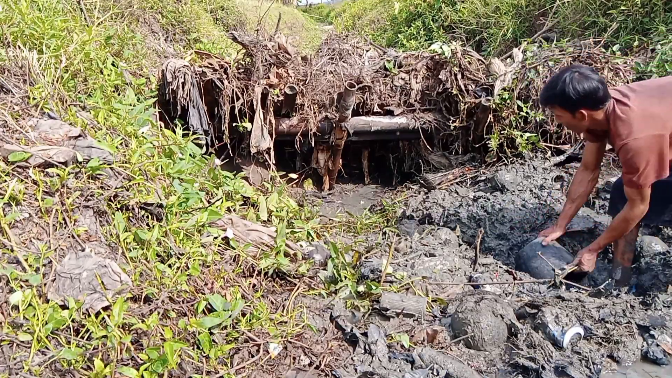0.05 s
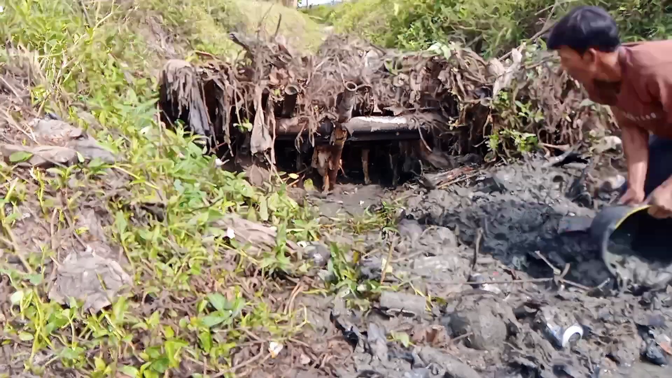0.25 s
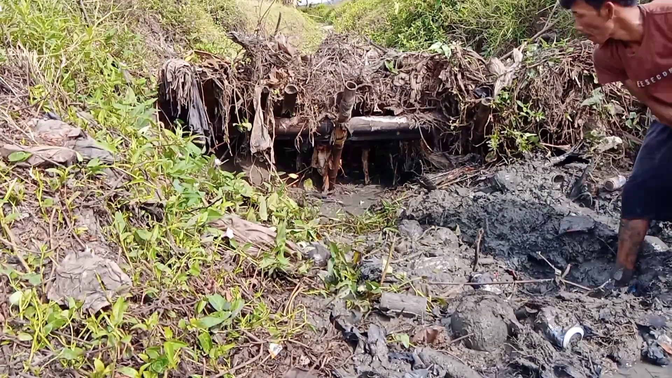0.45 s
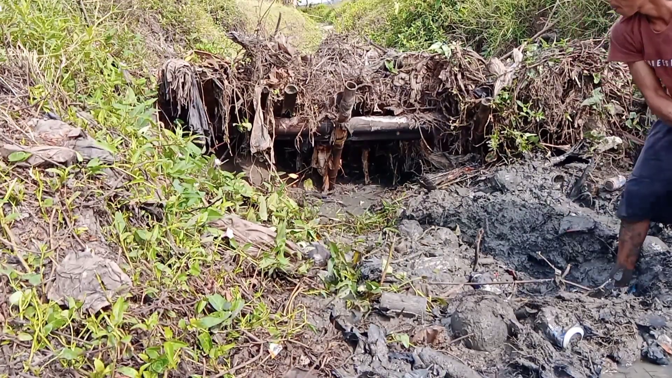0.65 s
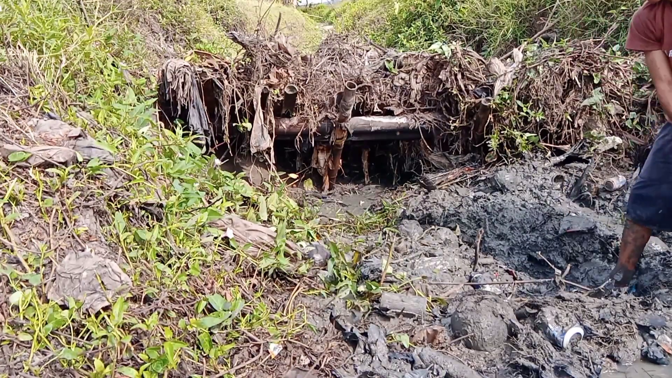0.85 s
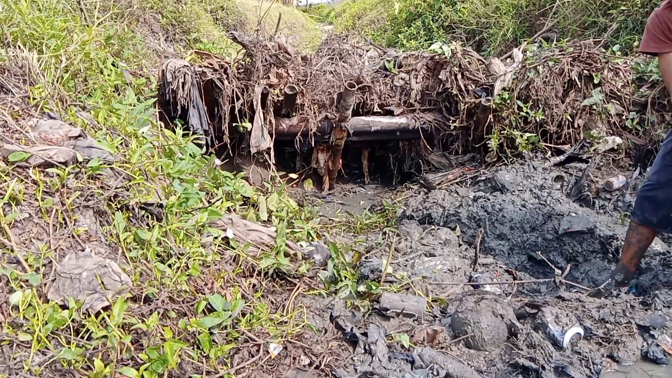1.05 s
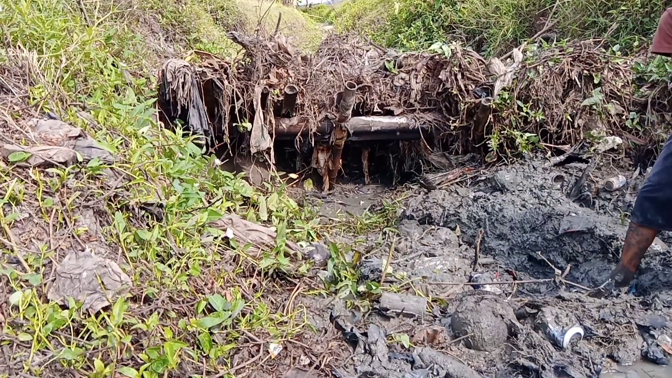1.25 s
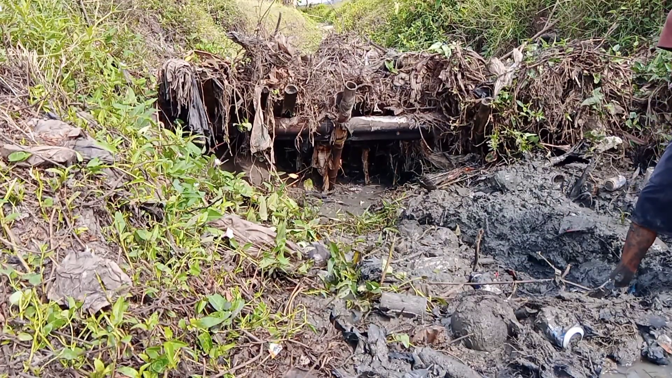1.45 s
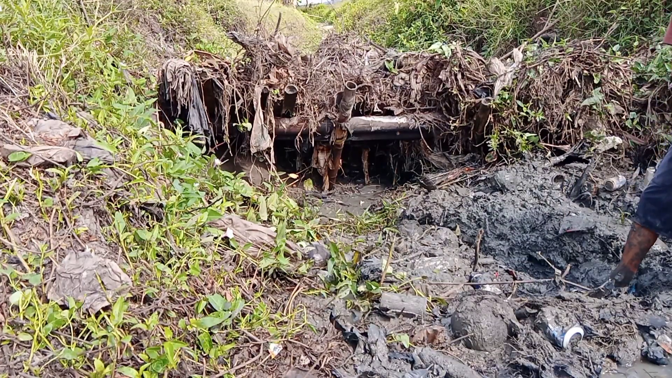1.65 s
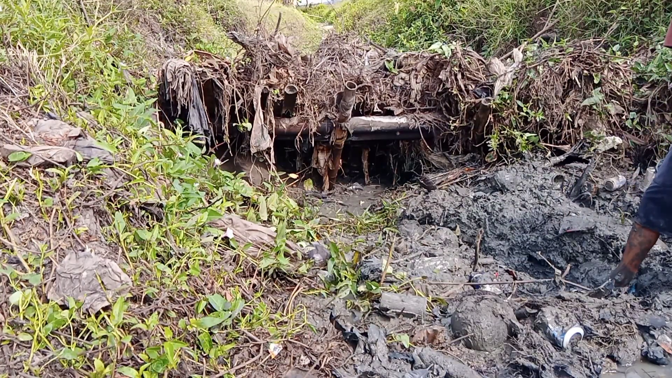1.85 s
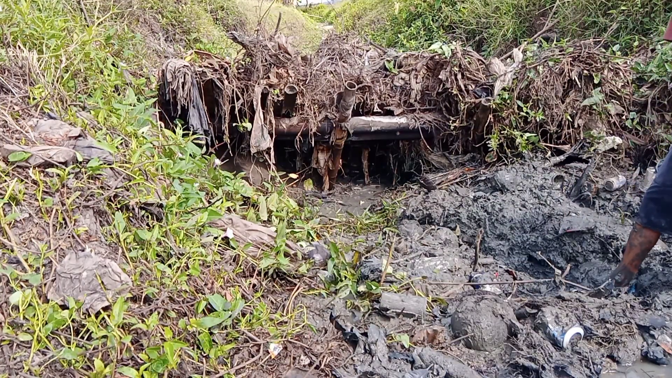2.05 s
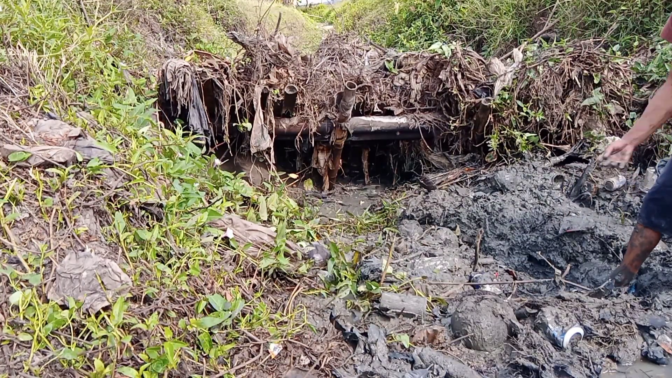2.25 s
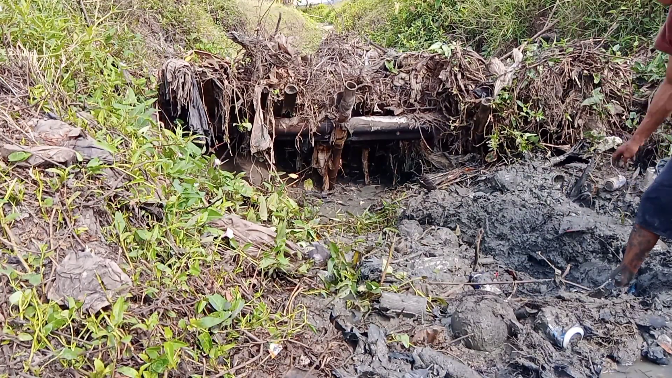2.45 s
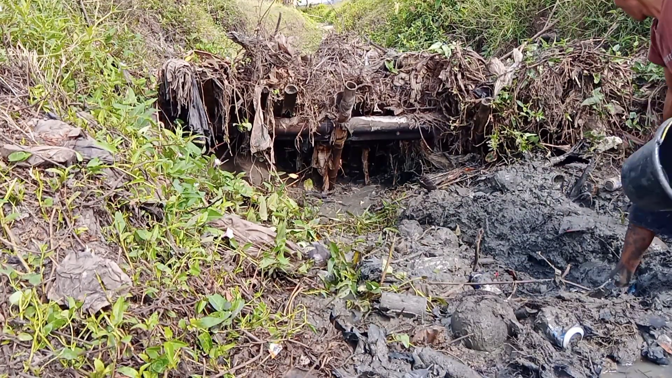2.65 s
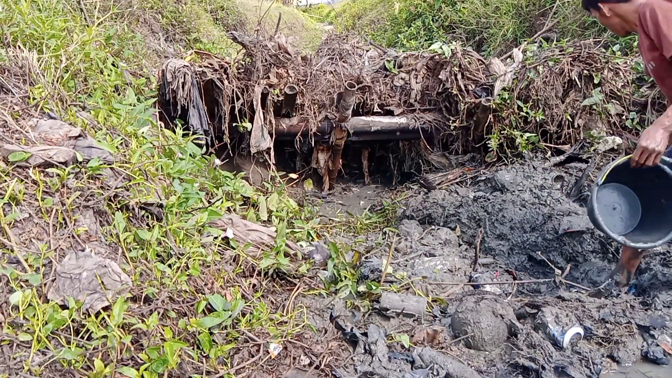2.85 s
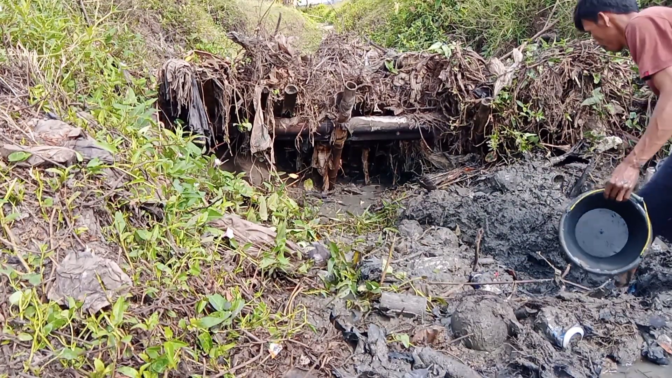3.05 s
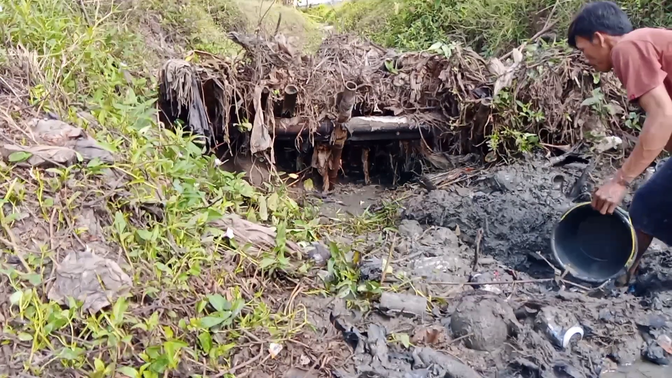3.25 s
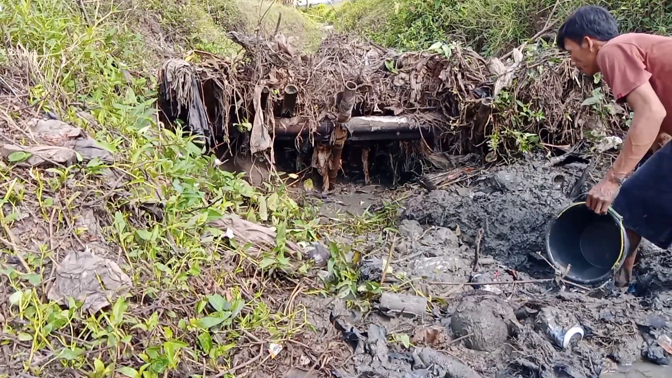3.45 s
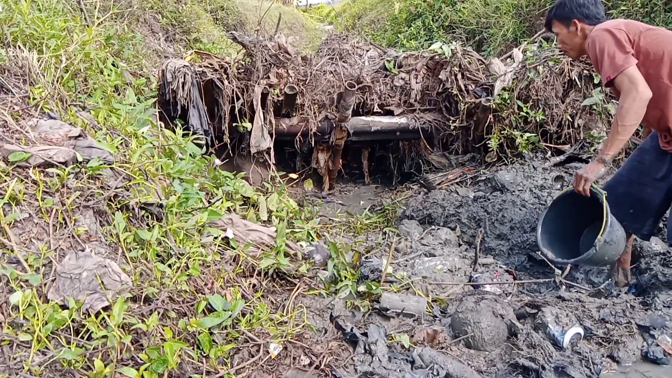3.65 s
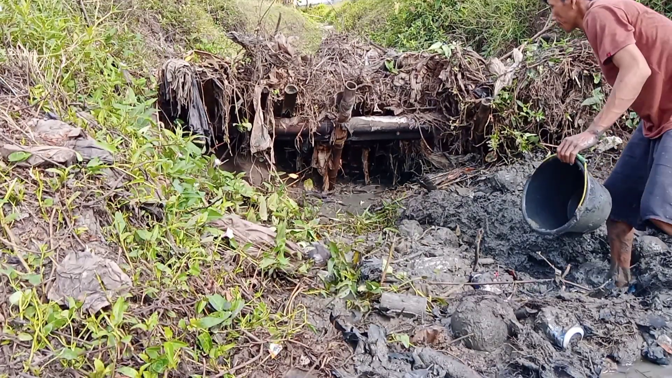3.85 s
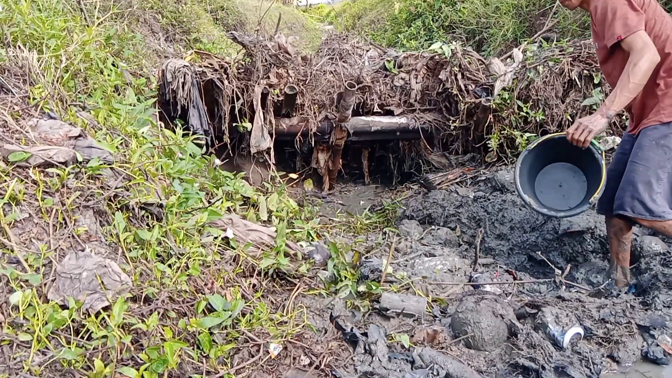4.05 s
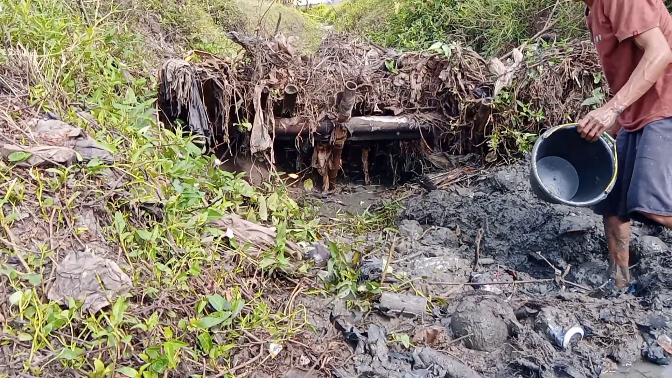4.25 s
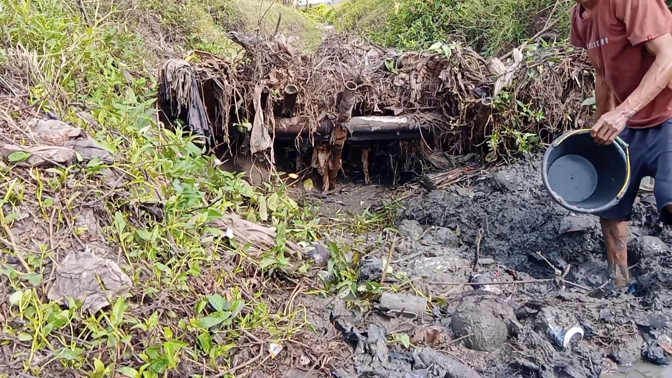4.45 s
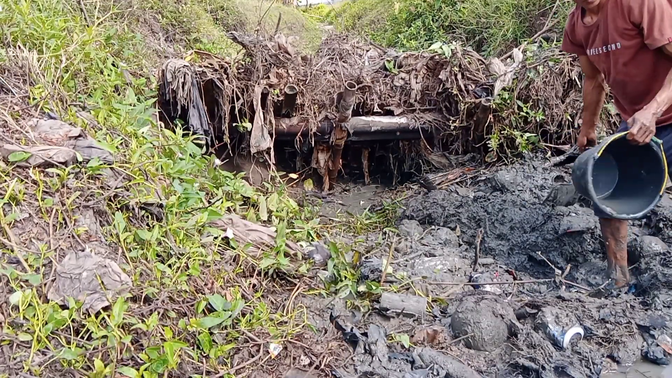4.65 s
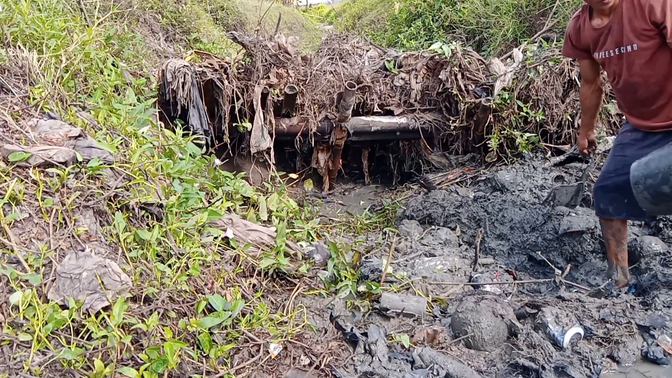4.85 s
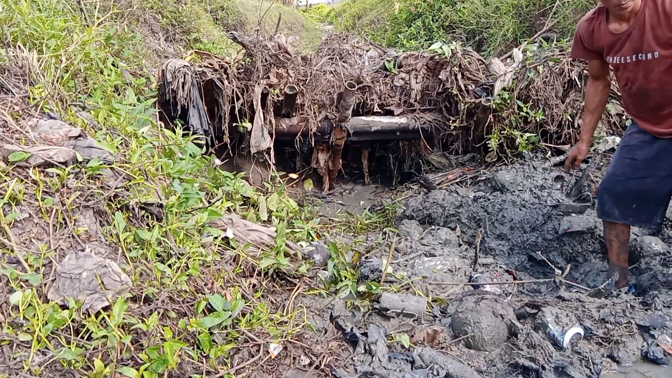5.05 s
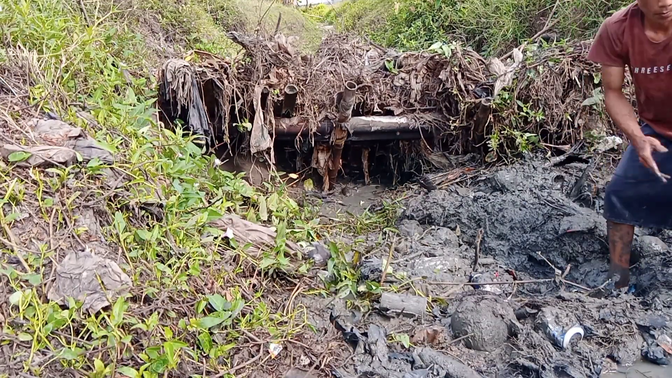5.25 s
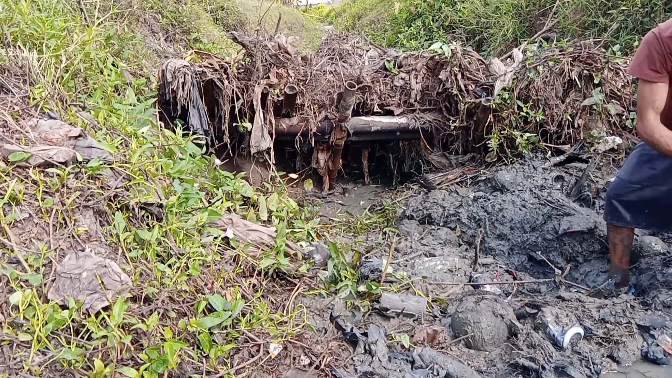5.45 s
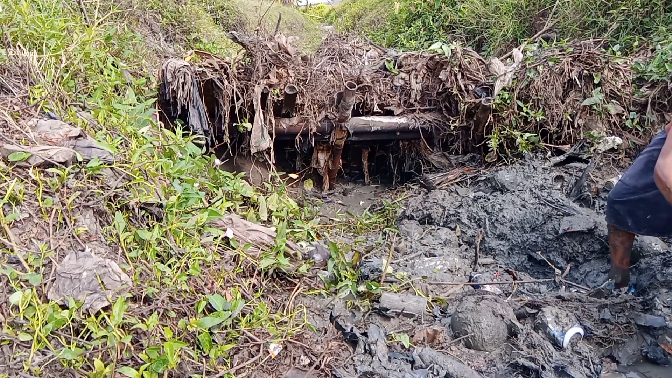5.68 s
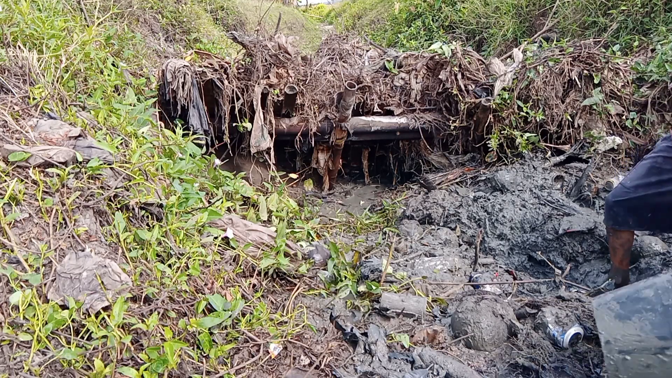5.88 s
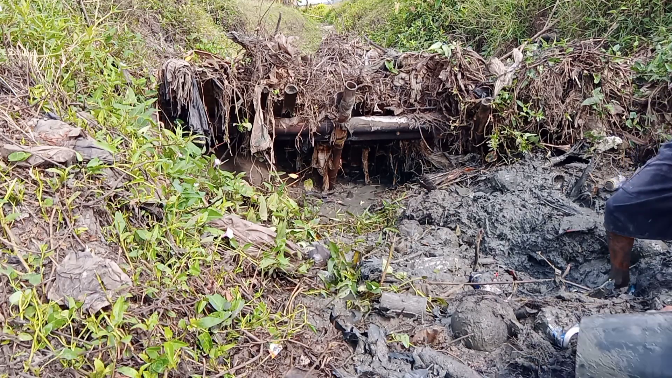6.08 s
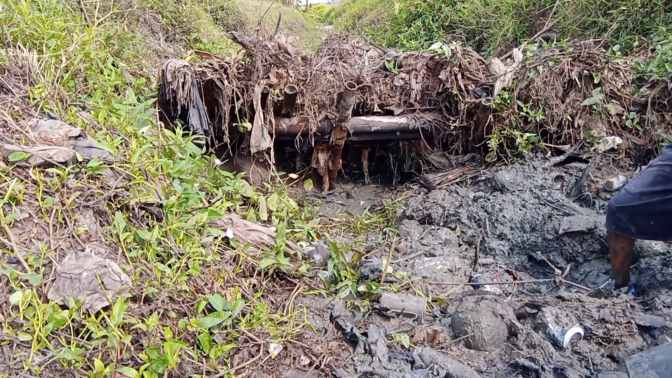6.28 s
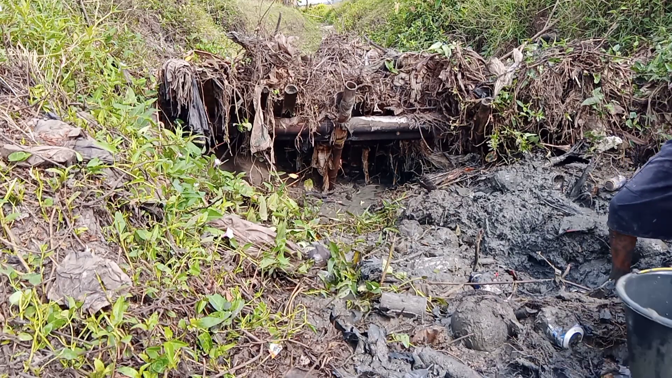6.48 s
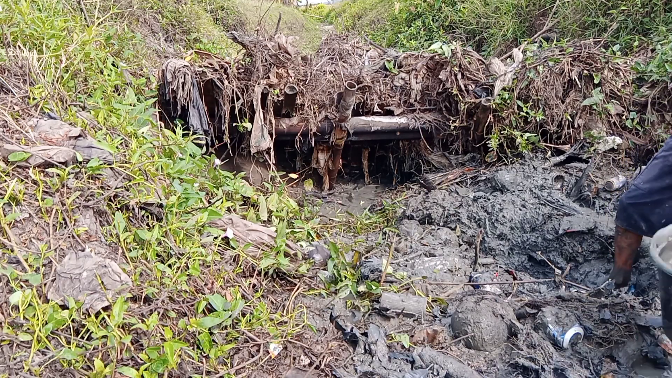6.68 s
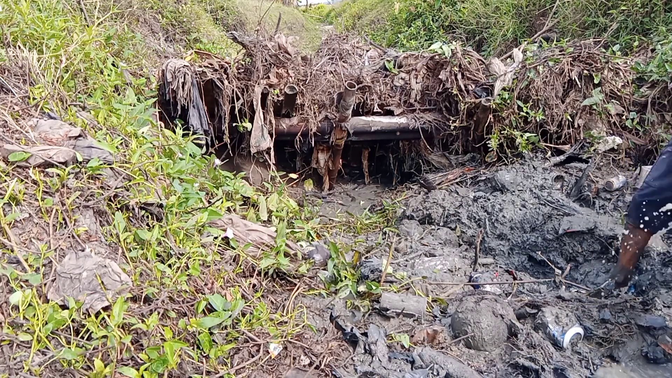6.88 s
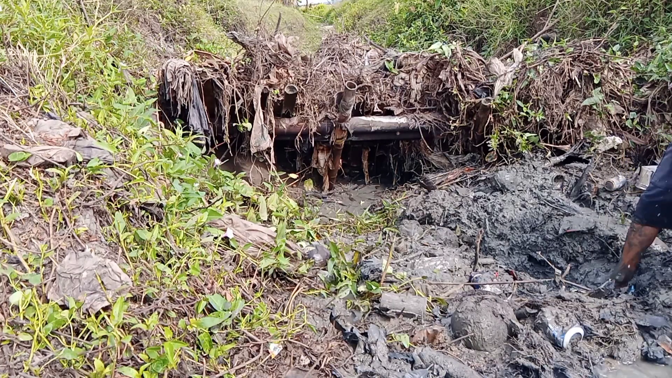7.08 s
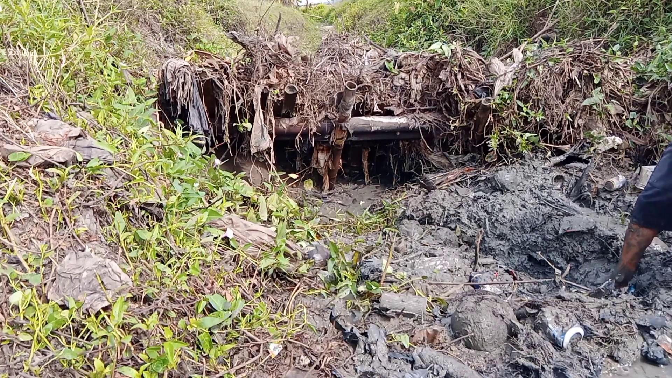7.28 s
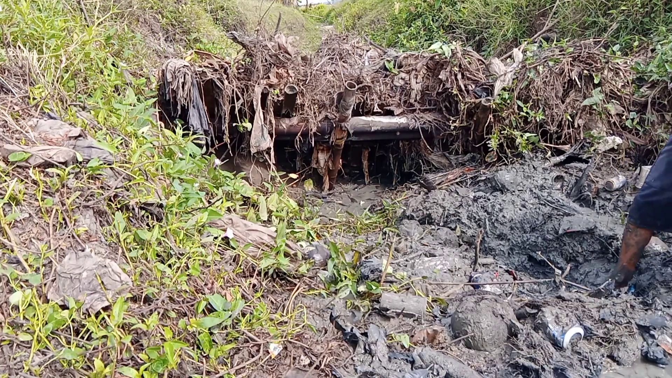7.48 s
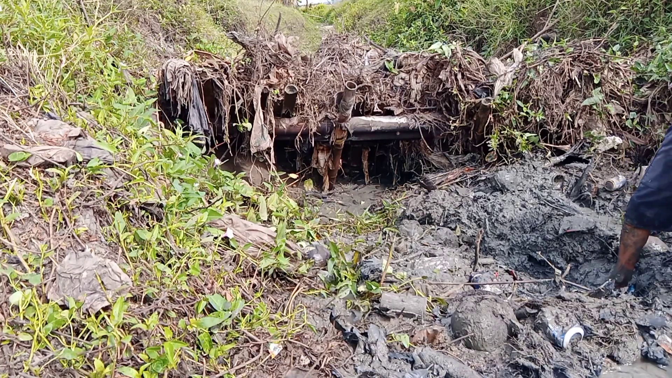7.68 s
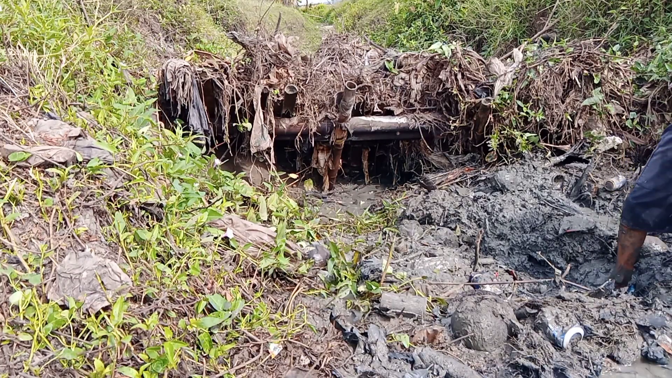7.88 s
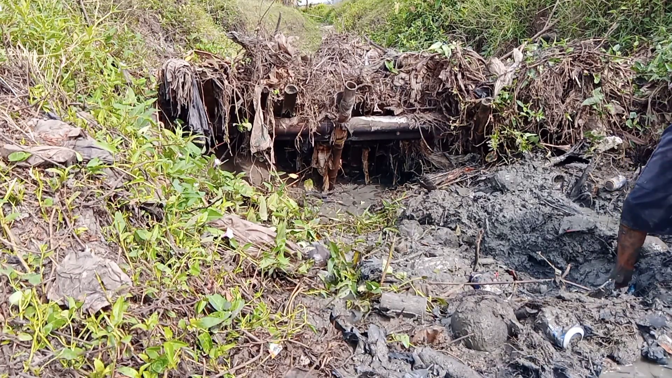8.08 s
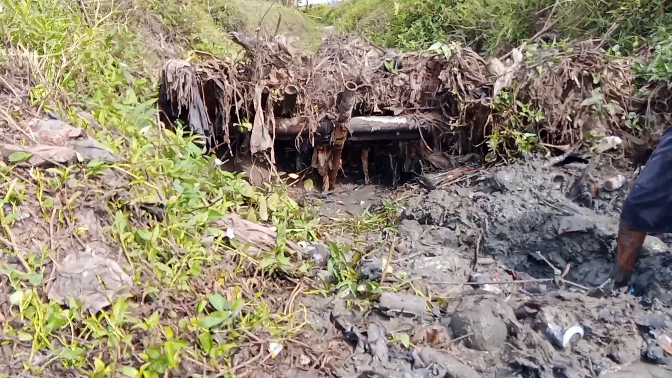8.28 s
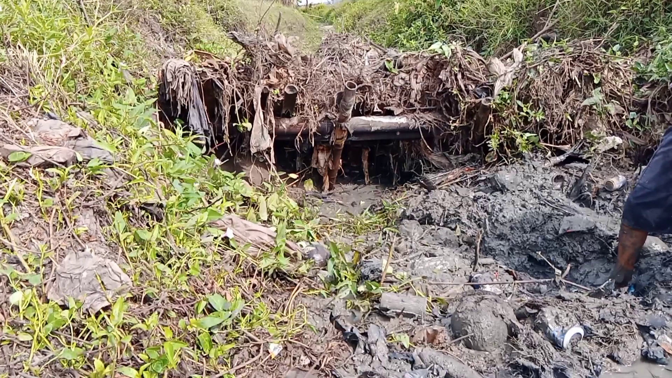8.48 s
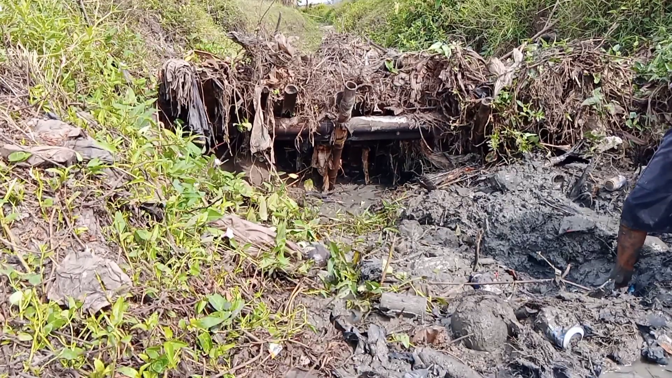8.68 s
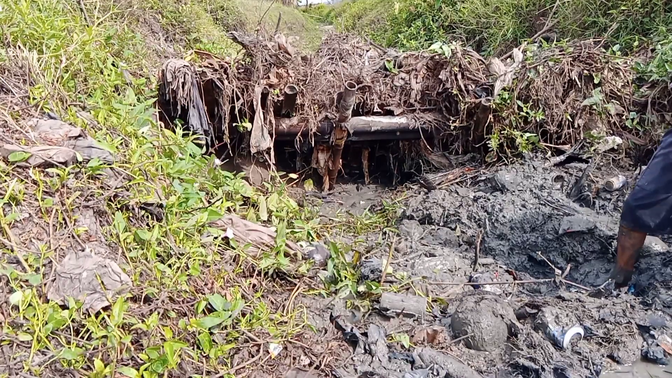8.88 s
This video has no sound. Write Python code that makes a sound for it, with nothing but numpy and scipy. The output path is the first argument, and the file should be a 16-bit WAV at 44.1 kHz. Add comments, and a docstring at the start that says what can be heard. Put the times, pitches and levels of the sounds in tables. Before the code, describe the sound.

One bucketful is lifted with deep gulps and thrown, the loudest hiss of droplets landing on mud within the first second. Sparse plops, sticky crackles and faint clods fill a quiet middle. Later, water churns with ringing bubbles, sharp wet slaps and streaming drips as the bucket scoops again. Close, dry outdoor microphone, with a low distant pump-like engine, faint high chirps and soft air.

```python
"""Close to a shallow muddy pool outdoors: a full plastic bucket is lifted out dribbling and its load is flung away.
The water, a cloud of bursting droplets over rising bubbles, lands on the mud and patters away.
Then mud squelches in fine crackles and feet shift in the shallows, with clods slapping down as short bursts of grit.
At last the bucket is dragged through the pool and drawn through once more, water streaming off it.
Throughout, a far one-cylinder engine, probably a pump, chugs as filtered pulses, with faint high chirps, air and breeze."""
import sys
import numpy as np
from scipy import signal
from scipy.fft import rfft, irfft
from scipy.io import wavfile
from scipy.ndimage import uniform_filter1d

SR = 44100
rng = np.random.default_rng(int(sys.argv[2]) if len(sys.argv) > 2 else 0)


def master_out(mix):
    """Clip the mix to full scale and print it as 16-bit PCM to the path in sys.argv[1]."""
    frames = np.transpose(np.atleast_2d(mix))
    ceiling = np.clip(frames, -1, 1)
    pcm = np.round(ceiling * 32767).astype(np.int16)
    wavfile.write(sys.argv[1], SR, pcm)


N = 393372
TIME = np.arange(N) / SR

# Surges of water: bucket lifted full and dribbling (from 0 s), load flung out (.75), feet in the shallows (3.78),
# bucket dragged through the pool (6.19) and drawn through once more (7.53).
# Each row: crest in seconds, hold in seconds, spray level in dB, bubbling level in dB (both before the trims
# of each layer), seconds to fade by 20 dB.
WATER_SURGES = [ (0, .005, -47, -36, .1), (.12, .06, -46, -48, .1), (.23, .08, -50, -58, .05),
                (.41, .07, -51, -53, .06), (.53, .06, -51, -68, .1), (.63, .05, -49, -57, .1),
                (.715, .01, -41, -43, .1), (.75, .1, -32.5, -37, .11), (.93, .1, -42.5, -45, .15),
                (1.22, .02, -61, -78, .5), (3.78, .26, -95, -75, .3), (5.335, .01, -82, -59, .15),
                (5.455, .025, -79, -56, .06), (5.64, .05, -80, -59, .04), (5.78, .05, -70, -62, .1),
                (5.915, .005, -65, -70, .06), (5.97, .08, -75, -59, .3), (6.19, .05, -65, -49, .15),
                (6.29, .07, -55, -48, .15), (6.485, .06, -52, -49, .1), (6.63, .3, -43.5, -43, .2),
                (7.05, .12, -47, -45, .25), (7.36, .07, -60, -66, .15), (7.53, .13, -55, -49.5, .2),
                (7.75, .04, -53, -54, .1), (7.81, .11, -44.5, -49, .4), (8.05, .1, -45.5, -48, .1),
                (8.23, .08, -46, -49, .08), (8.39, .08, -47, -52, .1), (8.52, .36, -41.5, -41.5, .12)]
SURGE_ATTACK_S = 0.05  # to rise by 20 dB

# Spectrum of droplets striking. Each row: frequency in Hz, relative level in dB per Hz.
DROPLET_SPECTRUM = [(500, -39), (1500, -6.5), (3000, -2.5), (4500, 1.5), (6000, 5), (7600, -5.5),
                    (9000, -9), (11000, -14), (13500, -18), (16000, -6)]

# Hollow ring of the splashing, strongest as the bucket is emptied.
# Each row: time in seconds, level in dB relative to the spray.
HOLLOW_RING = [(0, -18), (1.2, -12.5), (6.0, -26), (7.8, -25), (8.9, -19)]

# Big pockets of air pushed under water.
# Each row: crest in seconds, hold in seconds, level in dB before the trim of the deep bubbles.
AIR_GULPS = [(.005, .03, -44), (.088, .015, -47), (.18, .01, -59), (5.33, .015, -62), (5.46, .02, -68),
             (5.91, .01, -67), (6.005, .01, -56), (6.14, .04, -58), (6.195, .05, -43), (6.32, .05, -54),
             (6.55, .25, -63), (7.11, .12, -59), (7.37, .02, -59), (7.52, .06, -53), (7.65, .06, -62),
             (8.16, .012, -55)]
GULP_ATTACK_S, GULP_FADE_S = 0.02, 0.08  # to rise, to fade by 20 dB

# Single loud bubbles and drips.
# Each row: start in seconds, peak level in dB, starting pitch in Hz, cycles to die away by 60 dB.
LONE_BUBBLES = [(.003, -36, 239, 24), (.087, -34, 240, 14), (.178, -38, 1740, 57), (.243, -43, 2150, 57),
                (.531, -46, 2150, 59), (.695, -42, 1700, 76), (1.04, -37, 1980, 40), (1.055, -41, 706, 27),
                (1.676, -41, 5670, 120), (2.061, -34, 630, 14), (2.126, -36, 1264, 16),
                (2.275, -39, 1410, 5), (2.363, -42, 2260, 44), (2.658, -57, 2250, 57), (3.0, -59, 1430, 45),
                (3.492, -52, 2800, 72), (3.572, -61, 570, 42), (3.872, -54, 3950, 58),
                (4.28, -52, 3580, 30), (4.332, -52, 3840, 40), (5.249, -50, 6170, 47),
                (5.636, -34, 910, 13), (5.824, -44, 362, 16), (6.009, -37, 1000, 5), (6.165, -40, 315, 7),
                (6.205, -33, 298, 9), (6.357, -47, 380, 46), (6.258, -43, 617, 30), (6.281, -35, 767, 36),
                (6.306, -45, 1310, 30), (6.324, -43, 1550, 28), (6.432, -34, 5570, 82),
                (6.447, -39, 1170, 16), (6.483, -23, 2150, 16), (6.485, -41, 644, 87),
                (6.562, -25, 5100, 20), (6.592, -36, 1720, 16), (6.62, -21, 5570, 38), (6.64, -37, 745, 54),
                (6.722, -31, 2040, 25), (6.93, -35, 893, 110), (7.055, -33, 1190, 9), (7.06, -51, 165, 14),
                (7.167, -19, 2870, 16), (7.17, -23, 3580, 33), (7.487, -37, 1140, 5), (7.565, -42, 326, 21),
                (7.605, -40, 1800, 25), (7.655, -40, 1070, 12), (7.854, -27, 4480, 74),
                (7.884, -28, 3930, 56), (8.057, -37, 1830, 60), (8.128, -29, 2250, 15),
                (8.277, -45, 920, 24), (8.417, -28, 4450, 45), (8.529, -27, 1870, 46),
                (8.603, -33, 1310, 19)]

# Wet slaps. Each row: start in seconds, level in dB, tilt in dB
# (below 0 a thud of thick mud, above 0 a spatter of thin water).
WET_SLAPS = [(.002, -35, -2), (.086, -41, -3), (.706, -47, 14), (.756, -47, 13), (.854, -48, 17),
             (1.169, -58, 14), (1.401, -66, 15), (2.058, -37, 9), (2.077, -38, 4), (2.1, -52, 11),
             (2.359, -55, 8), (2.657, -69, 8), (3.572, -68, 2), (5.323, -68, -6), (5.455, -59, -2),
             (5.635, -50, -8), (5.769, -56, 2), (5.821, -45, -3), (6.008, -46, -1), (6.056, -39, 4),
             (6.061, -34, 6), (6.194, -45, -5), (6.241, -48, -11), (6.482, -42, 6), (6.56, -45, 13),
             (6.76, -38, 5), (6.907, -40, 10), (6.926, -39, 4), (6.996, -44, 8), (7.052, -38, 7),
             (7.099, -37, 4), (7.37, -47, 1), (7.471, -54, 13), (7.543, -43, -1), (7.655, -50, 2),
             (7.91, -43, 13), (8.374, -51, 17), (8.496, -47, 12), (8.527, -42, 10), (8.831, -46, 18),
             (8.874, -39, 9)]

# Wet mud working under shifting feet. Each row: crest in seconds, hold in seconds, level in dB.
MUD_SQUELCHES = [(1.48, .04, -74), (1.61, .1, -75), (1.865, .02, -68), (1.96, .07, -77), (2.075, .04, -49),
                 (2.24, .05, -72), (2.45, .06, -75), (2.61, .06, -67), (2.98, .03, -76), (3.49, .1, -75),
                 (3.875, .03, -73), (3.94, .01, -70), (4.02, .02, -75), (4.3, .03, -75), (4.43, .015, -71),
                 (4.66, .17, -77), (4.92, .015, -68), (5.07, .1, -79), (5.24, .04, -73), (5.77, .08, -66)]
SQUELCH_ATTACK_S, SQUELCH_FADE_S = 0.025, 0.065  # to rise, to fade by 20 dB

# Pace and loudness of the distant engine. Each row: time in seconds, firings per second, level in dB.
ENGINE_RUN = [(0, 20.63, -61), (1.3, 20.64, -61.5), (2.2, 20.8, -63.5), (2.8, 20.52, -64),
              (3.8, 20.27, -65), (5.2, 20.38, -66), (6.2, 20.25, -66.5), (7.4, 20.26, -70),
              (8.92, 20.15, -71)]

# Spectrum of its exhaust thump. Each row: frequency in Hz, relative level in dB per Hz.
EXHAUST_SPECTRUM = [(30, -48), (60, -17.5), (82, -3.5), (102, 2.5), (125, 1), (145, -0.5), (185, -25.5),
                    (245, -17), (310, -14.5), (400, -24.5), (600, -55), (3000, -85)]

# Spectrum of the open air. Each row: frequency in Hz, relative level in dB per Hz.
AIR_SPECTRUM = [(25, 7), (70, -1), (150, 17), (300, 3), (600, 3.5), (1300, -2), (2500, -9), (5500, -5),
                (7700, -10.5), (10000, -14), (13500, -20), (16000, -14.5)]

# Resonances and notches of the microphone port.
# Each row: frequency in Hz, width in Hz (a notch is widened further by its depth), gain in dB.
PORT_RESONANCES = [(1249.4, 53.5, 10), (6660, 180, -15), (7310, 990, 8), (15100, 830, 10)]


def from_db(db):
    """Amplitude gain of a level in dB."""
    return 10 ** (np.asarray(db) / 20)


def rms_one(x):
    """Scale to an rms of 1."""
    return x / np.sqrt(np.mean(x ** 2) + 1e-20)


def in_time(rows):
    """Each column of a curve at every sample."""
    seconds, *columns = np.transpose(rows)
    return [np.interp(TIME, seconds, column) for column in columns]


def add(out, start_s, sound):
    """Mix a short sound in at its start time."""
    at = int(np.clip(start_s * SR, 0, N - 1))
    out[at:at + len(sound)] += sound[:N - at]


def swells(rows, attack_s):
    """Gain curve from rows of crest s, hold s, dB, s to fade by 20 dB; overlapping swells add in power."""
    power = np.zeros(N)
    for crest_s, hold_s, db, fade_s in rows:
        start_s = max(crest_s - 2 * attack_s, 0)
        age = TIME[:SR] + start_s - crest_s
        rising = np.maximum(-age, 0) / attack_s
        fading = np.maximum(age - hold_s, 0) / fade_s
        add(power, start_s, from_db(db - 20 * (rising + fading)) ** 2)
    return np.sqrt(power)


def band(x, low_hz, high_hz):
    """Keep one band of frequencies."""
    sections = signal.butter(2, [low_hz, high_hz], "band", fs=SR, output="sos")
    return signal.sosfilt(sections, x + 1e-18)


def colour(x, spectrum, size=4096):
    """Causal (minimum-phase) filter with the given spectrum; rms 1."""
    hz, db = np.transpose(spectrum)
    grid = np.maximum(np.fft.rfftfreq(size, 1 / SR), 1)
    gain = from_db(np.interp(np.log(grid), np.log(hz), db))
    cepstrum = irfft(np.log(gain))
    # folding the cepstrum onto positive time puts the energy as early as possible
    index = np.arange(size)
    folded = 2 * cepstrum * (index < size // 2) * (index > 0)
    response = irfft(np.exp(rfft(folded)))
    return rms_one(signal.fftconvolve(x, response)[:N])


def drift(per_s):
    """Smooth random wander of spread 1, with per_s new values a second."""
    points = rng.standard_normal(N // 10)
    return rms_one(np.interp(TIME * per_s, np.arange(N // 10), points))


def evened(x, span_s):
    """Hold the running level of a grain cloud near 1 and keep its fine grain."""
    span = int(span_s * SR) + 1
    power = uniform_filter1d(uniform_filter1d(x ** 2, span), span)
    return x / np.sqrt(np.abs(power) + np.mean(x ** 2) / 100)


def bubble(hz, cycles, rise, swell=1.5):
    """A trapped bubble swells in about a cycle, rings down and climbs in pitch as it nears the surface."""
    age = np.arange(int(cycles / hz * SR) + 2) * hz / SR  # in cycles of the starting pitch
    envelope = from_db(-60 * age / cycles) * (1 - np.exp(-(age / swell) ** 2))
    phase = 2 * np.pi * age * (1 + rise * age / cycles / 2)
    return envelope / envelope.max() * np.sin(phase)


def bubble_cloud(low_hz, high_hz, cycles, rise, spread_db, tilt_db, count):
    """Bubbles born at random, spread over log pitch, with tilt_db per octave; cycles and rise are averages."""
    out = np.zeros(N)
    for when, size, strength, damping, depth in rng.random((count, 5)):
        hz = low_hz * (high_hz / low_hz) ** size
        strength_db = -spread_db * np.log(max(strength, 0.01))
        gain = from_db(strength_db + tilt_db * np.log2(hz / low_hz))
        add(out, when * N / SR, gain * bubble(hz, cycles * (0.5 + damping), 2 * rise * depth))
    return rms_one(out)


def crackle(per_s, spread_db, clump_db):
    """Droplet impacts of very uneven size, their strength wandering in clumps."""
    born = rng.random(N) < per_s / SR
    uneven_db = spread_db * np.minimum(rng.exponential(1, N), 5)
    sizes = from_db(uneven_db + clump_db * drift(170))
    return born * sizes * rng.choice([-1, 1], N)


def spray():
    """Droplets click and leave tiny ringing bubbles; the harder the splash, the denser they fall."""
    rows = [(crest_s, hold_s, db, fade_s) for crest_s, hold_s, db, _, fade_s in WATER_SURGES]
    # the drops come down in uneven handfuls
    gain = swells(rows, SURGE_ATTACK_S) * from_db(0.7 * drift(50))
    impacts = crackle(per_s=4000 * (gain / from_db(-45)) ** 0.51, spread_db=3.5, clump_db=4.0)
    clicks = evened(colour(impacts, DROPLET_SPECTRUM), span_s=0.1)
    fizz = bubble_cloud(low_hz=3077, high_hz=8210, cycles=55, rise=0.19, spread_db=5.5, tilt_db=6.0, count=4600)
    fizz = evened(fizz, span_s=0.036)
    # the patter keeps one narrow, hollow tone ringing
    ring = evened(band(impacts, low_hz=1166, high_hz=1320), span_s=0.04)
    hollow = from_db(in_time(HOLLOW_RING)[0]) * ring
    return gain * (from_db(-1.5) * clicks + from_db(-7.0) * fizz + hollow)


def slosh():
    """Stirred water: small bubbles over a wash of lapping, and deep gulps of air."""
    small = bubble_cloud(low_hz=1400, high_hz=3570, cycles=33, rise=0.56, spread_db=4.0, tilt_db=1.5, count=2400)
    middling = bubble_cloud(low_hz=617, high_hz=1400, cycles=23, rise=0.3, spread_db=3.5, tilt_db=4.5, count=1000)
    wash = rms_one(band(crackle(per_s=4000, spread_db=3.0, clump_db=3.5), low_hz=795, high_hz=1920))
    deep = bubble_cloud(low_hz=278, high_hz=620, cycles=12, rise=0.38, spread_db=1.5, tilt_db=2.5, count=900)
    rows = [(crest_s, hold_s, db, fade_s) for crest_s, hold_s, _, db, fade_s in WATER_SURGES]
    stir = swells(rows, SURGE_ATTACK_S)
    # any surge makes some big bubbles, up to the most that the shallow pool can hold
    deep_share = np.minimum(from_db(-22) * stir, from_db(-63))
    pockets = swells([(*row, GULP_FADE_S) for row in AIR_GULPS], GULP_ATTACK_S)
    gulps = np.hypot(pockets, deep_share)
    # gentle stirring only laps; it takes a brisk stroke to pull air under
    aerated = np.minimum(stir / from_db(-52), 1) ** 1.2
    bubbles = aerated * (small + from_db(-4.0) * middling)
    gurgle = evened(bubbles + from_db(-3.0) * wash, span_s=0.028)
    flutter = from_db(1.5 * drift(70))
    shallow = from_db(-3.2) * stir * flutter * gurgle
    return shallow + from_db(-4.0) * gulps * evened(deep, span_s=0.032)


def plops():
    """The bubbles that stand out on their own, each a ringing tone that climbs in pitch."""
    out = np.zeros(N)
    for start_s, db, hz, cycles in LONE_BUBBLES:
        add(out, start_s, from_db(db) * bubble(hz, cycles, rise=0.3, swell=1.3))
    return out


def splats(attack_s=0.0008, fade_s=0.012, smack_db=2.5):
    """Each slap is a short gritty burst: a thud of the mud, a smack of its surface and a spatter of drops."""
    grit = crackle(per_s=14000, spread_db=1.5, clump_db=-2.0)
    thud = band(grit, low_hz=240, high_hz=611)
    smack = band(grit, low_hz=650, high_hz=2480)
    spatter = colour(grit, DROPLET_SPECTRUM)
    envelopes = np.zeros((3, N))
    age = TIME[:SR // 4]
    shape = (1 - np.exp(-age / attack_s)) * np.exp(-2 * age / fade_s)
    for start_s, db, tilt_db in WET_SLAPS:
        for envelope, part_db in zip(envelopes, (-tilt_db, smack_db, tilt_db)):
            add(envelope, start_s, from_db(db + part_db) * shape)
    parts = (thud, smack, spatter)
    return sum(envelope * evened(part, span_s=0.01) for envelope, part in zip(envelopes, parts))


def mud():
    """Sticky mud sucks and tears in fine crackles."""
    tearing = rms_one(band(crackle(per_s=2300, spread_db=3.0, clump_db=5.0), low_hz=800, high_hz=5000))
    sucking = bubble_cloud(low_hz=913, high_hz=4300, cycles=32, rise=0.15, spread_db=4.0, tilt_db=-0.5, count=1800)
    squelches = swells([(*row, SQUELCH_FADE_S) for row in MUD_SQUELCHES], SQUELCH_ATTACK_S)
    working = np.hypot(squelches, from_db(-85.5))  # the wet mud is never quite still
    return working * evened(sucking + from_db(0.5) * tearing, span_s=0.021)


def banks(x, t60_s=0.11, echo_db=-16):
    """The mud banks and plants scatter a short faint tail."""
    age = TIME[:SR // 2]
    noise = band(rng.standard_normal(len(age)), low_hz=258, high_hz=9000)
    tail = noise * from_db(-60 * age / t60_s) * (age > 0.004)
    return x + from_db(echo_db) * signal.fftconvolve(x, tail / np.linalg.norm(tail))[:N]


def engine(first_firing=0.42, lag_hz=105, lag_width_hz=75):
    """One thump per firing; the silencer holds back the bass, so each thump falls in pitch."""
    per_s, db = in_time(ENGINE_RUN)
    turns = np.floor(np.cumsum(per_s) / SR + first_firing)
    firings = np.diff(turns, prepend=turns[0]) * from_db(1.3 * drift(13))
    # an all-pass delays the frequencies around lag_hz
    _, poles = signal.iirpeak(lag_hz, lag_hz / lag_width_hz, fs=SR)
    lagged = signal.lfilter(poles[::-1], poles, firings)
    return from_db(db) * colour(lagged, EXHAUST_SPECTRUM)


def chirps():
    """Faint flurries of tiny high chirps, perhaps insects: short ringing tones whose level wanders."""
    # the bubble grain serves as a chirp here: a high tone that rings down with hardly any climb
    tones = bubble_cloud(low_hz=4000, high_hz=8300, cycles=130, rise=0.03, spread_db=2.2, tilt_db=2.0, count=1100)
    return from_db(-82.5) * rms_one(tones * from_db(4.5 * drift(14)))


def open_air():
    """The steady hush of the place: noise with a fixed spectrum."""
    return from_db(-75.5) * colour(rng.standard_normal(N), AIR_SPECTRUM)


def breeze():
    """Light air buffets the microphone in low lumps."""
    rumble = rms_one(band(rng.standard_normal(N), low_hz=45, high_hz=110))
    return from_db(-86) * rumble * from_db(4.0 * drift(5))


def scene():
    """Water, mud and chirps with their scattered tail, then the far engine, air and breeze; one channel."""
    scattered = banks(spray() + slosh() + splats() + plops() + mud() + chirps())
    return (scattered + engine() + open_air() + breeze())[None]


def record(dry):
    """The microphone port rings and notches; the top is cut."""
    out = dry
    for hz, width_hz, db in PORT_RESONANCES:
        # a notch is wider than a peak by its depth
        sharpness = hz / width_hz * min(from_db(db / 2), 1)
        b, a = signal.iirpeak(hz, sharpness, fs=SR)
        out = out + (from_db(db) - 1) * signal.lfilter(b, a, out)
    top_cut = signal.ellip(12, 0.3, 80, 15600, fs=SR, output="sos")  # low-pass at 15600 Hz
    return signal.sosfilt(top_cut, out)


dry = scene()
out = record(dry)
master_out(out)
```